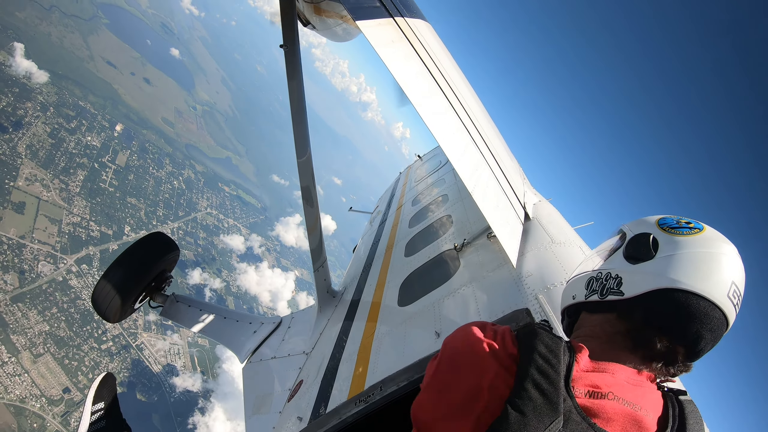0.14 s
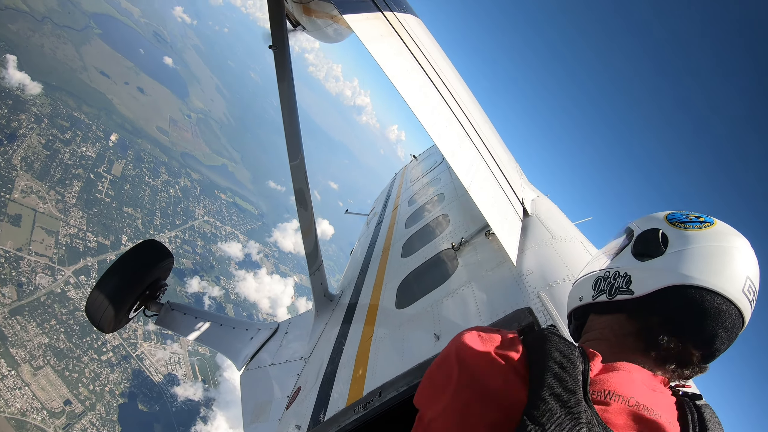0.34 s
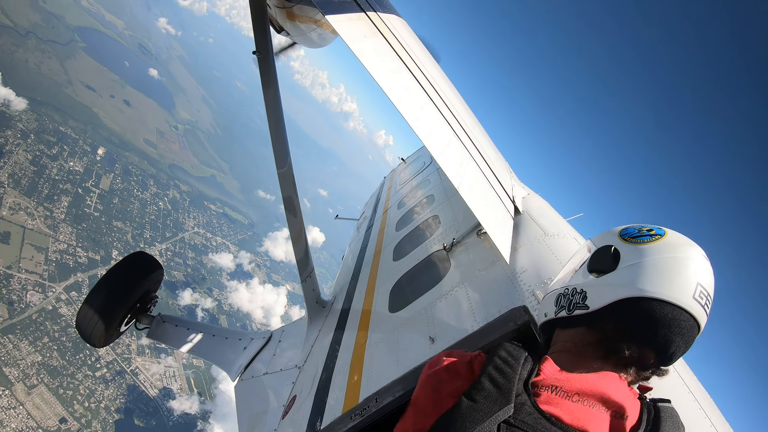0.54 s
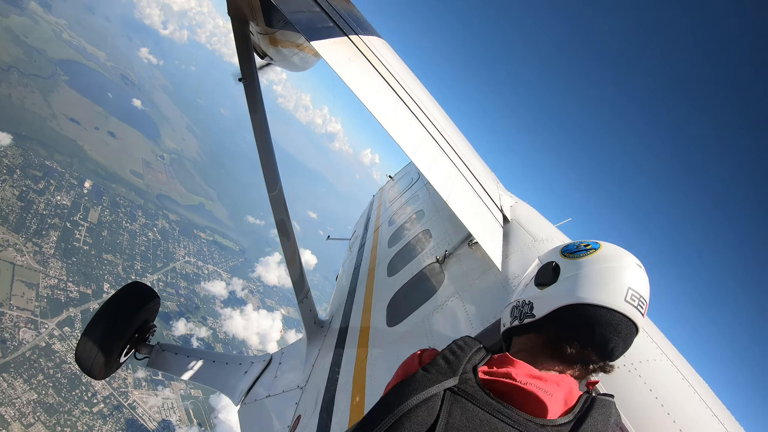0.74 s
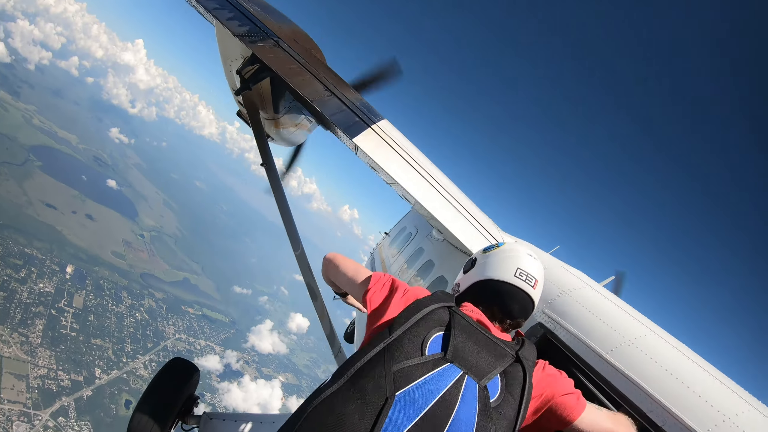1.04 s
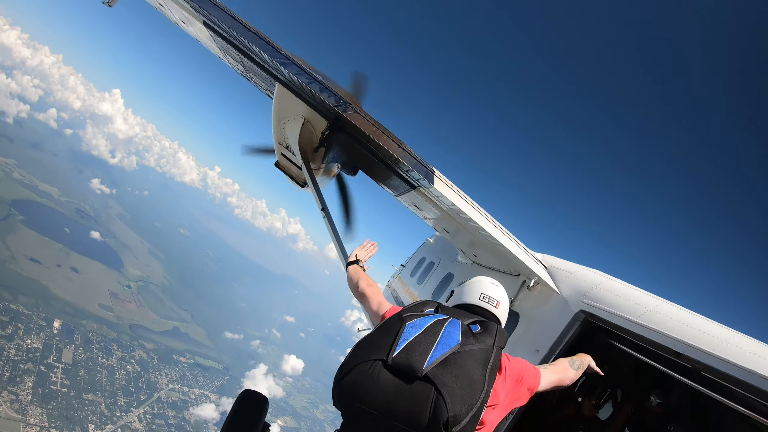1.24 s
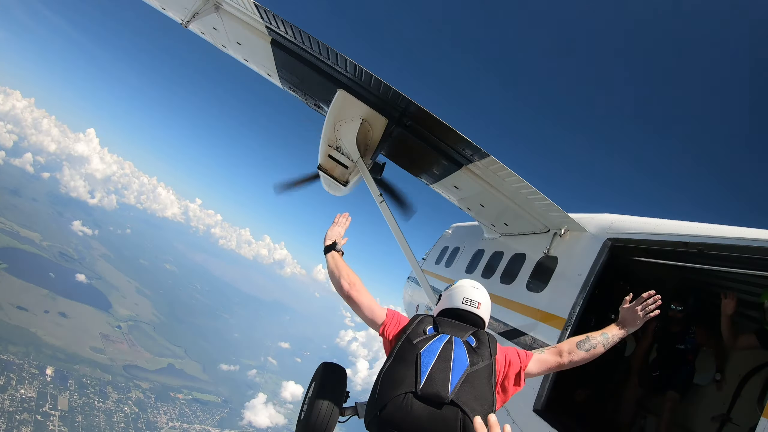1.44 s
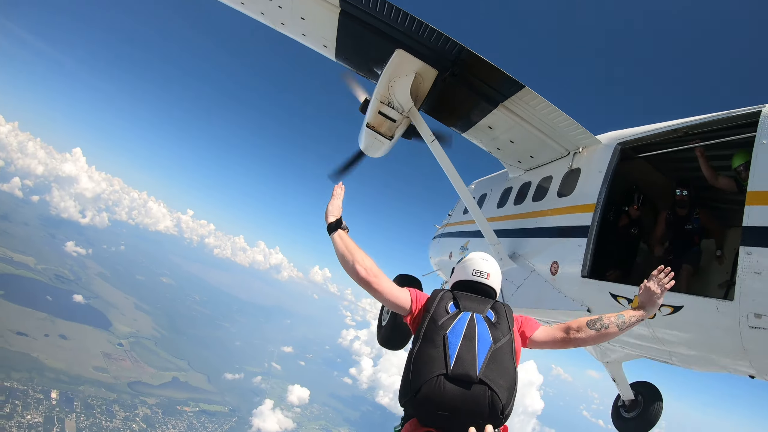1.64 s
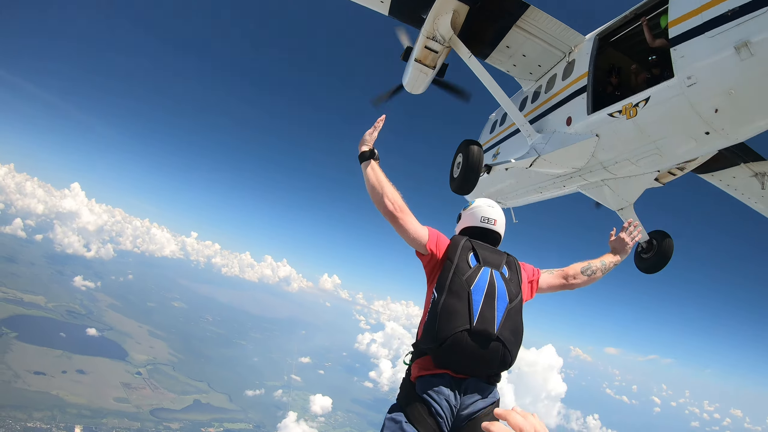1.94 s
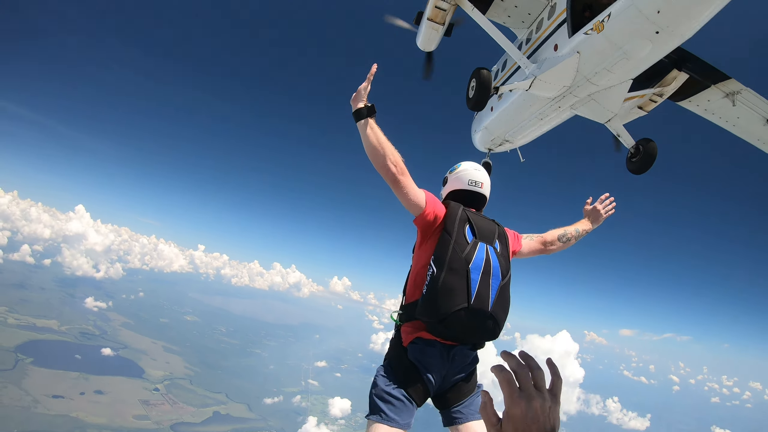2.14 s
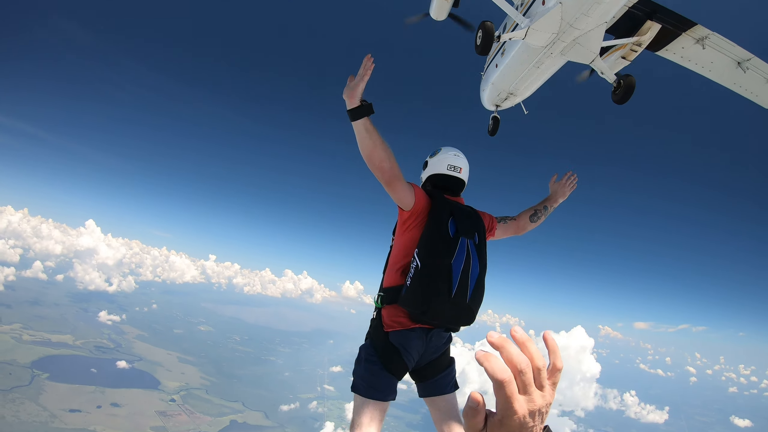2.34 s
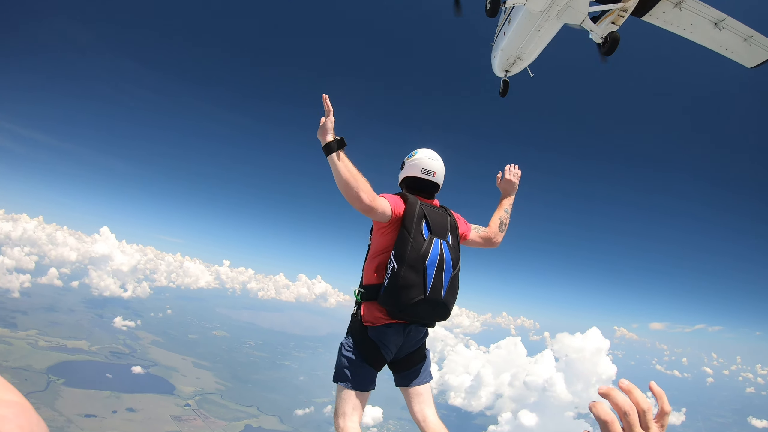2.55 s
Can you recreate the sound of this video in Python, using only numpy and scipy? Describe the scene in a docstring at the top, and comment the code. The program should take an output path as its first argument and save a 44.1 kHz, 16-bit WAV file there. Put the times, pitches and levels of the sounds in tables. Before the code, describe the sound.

Turbulent wind roar throughout, with hard thumps, fluttering gusts and small cloth crackles; a wavering aircraft propeller drone lies behind the first half, then freefall wind alone grows fuller, the microphone overloading slightly.

```python
"""Wind tears over a helmet camera's microphone as a jumper drops away from a propeller aircraft.
Turbulence is built as filtered noise: large eddies rumble, small ones rush past at an unsteady speed,
gusts burst as brief envelopes, and single eddies slap as dips in pressure. Cloth and straps crackle,
air whistles and spits at edges. Behind them the propeller's wavering drone sinks and dies away, and
the slipstream's noise bands thin out. The loudest swings are rounded off."""
import sys
import numpy as np
from scipy import signal
from scipy.fft import rfft, irfft
from scipy.io import wavfile
from scipy.ndimage import uniform_filter1d

SR = 44100
rng = np.random.default_rng(int(sys.argv[2]) if len(sys.argv) > 2 else 0)


def transcribe(signal):
    """Save signal, clipped to [-1, 1], as a 16-bit WAV file at the path in sys.argv[1]."""
    frames = np.atleast_2d(signal).T
    limited = np.clip(frames, -1, 1)
    pcm = np.round(limited * 32767).astype(np.int16)
    wavfile.write(sys.argv[1], SR, pcm)


def invert_db(level):
    """Linear amplitude ratio for a level in decibels (20 dB per decade), elementwise."""
    return 10 ** (np.asarray(level, dtype=float) / 20)


N = 118629
T = np.arange(N) / SR  # s

# large eddies: t/s, level of deep thuds/dB, level of boom/dB, level of body of the rumble/dB
EDDY_LEVELS = [(0.0, -25, -28, -13), (0.4, -21.5, -17, -15), (1.18, -20, -22, -16),
               (1.225, -19.5, -18.5, -23), (1.44, -23, -14, -15), (1.62, -15.5, -20.5, -25),
               (1.88, -17.5, -26.5, -21), (2.01, -20.5, -16.5, -23), (2.1, -13.5, -22, -20.5),
               (2.24, -22, -19.5, -16.5), (2.32, -23.5, -28.5, -17), (2.4, -24, -23, -16),
               (2.61, -17, -16, -19), (2.66, -29, -9.5, -22.5)]
# gusts: t/s at the end of the rise, envelope level before its fall/dB, fall time/s
GUST_TIMES = [(0.125, -23, 0.0084), (0.26, -18, 0.013), (0.299, -23, 0.009), (0.459, -22.5, 0.0066),
              (0.561, -7, 0.0026), (0.748, -15, 0.0052), (0.949, -22.5, 0.019), (1.084, -6, 0.0043),
              (1.109, -14.5, 0.0084), (1.123, -19, 0.021), (1.159, -6, 0.0042), (1.185, -13.5, 0.0039),
              (1.25, -15, 0.013), (1.312, -7.5, 0.0027), (1.393, -17, 0.0051), (1.415, -12, 0.007),
              (1.447, -11.5, 0.0062), (1.471, -10, 0.0044), (1.511, -10, 0.0045), (1.539, -21.5, 0.0034),
              (1.553, -15.5, 0.013), (1.638, -16, 0.0039), (2.081, -22, 0.0069), (2.147, -17.5, 0.012),
              (2.275, -10, 0.0062), (2.308, -14.5, 0.007), (2.34, -12, 0.0078), (2.367, -15.5, 0.027),
              (2.416, -10.5, 0.0073), (2.448, -22.5, 0.02), (2.491, -12, 0.012), (2.57, -16, 0.016),
              (2.627, -15, 0.015)]
FLUTTER_HZ, FLUTTER_DB = 147, 1  # upper corner of the flutter; its rms depth in the rush and the gusts


def evened(x):
    """Normalisation of power: scales to rms 1."""
    return x / np.sqrt(np.mean(x ** 2) + 1e-20)


def read(points, hz):
    """Spectral density in dB, interpolated over log frequency; -120 dB outside the table."""
    f, value = np.transpose(points)
    return np.interp(np.log(hz + 1), np.log(f + 1), value, left=-120, right=-120)


def curve(rows, t, axis):
    """Slow variation in time: linear interpolation of one column of a time table."""
    rows = np.array(rows)
    return np.interp(t, rows[:, 0], rows[:, axis])


def wobble(size, rate, top_hz):
    """Band-limited random modulation of rms 1, weakened below a low corner and above top_hz."""
    low_hz = min(4, top_hz / 4)
    hz = np.fft.rfftfreq(size, 1 / rate)
    shape = hz / np.sqrt((hz ** 2 + low_hz ** 2) * (1 + (hz / top_hz) ** 4))
    return evened(irfft(rfft(rng.standard_normal(size)) * shape, size))


def noise(field_db, size):
    """Time-varying filtering: random Fourier bins weighted by field_db(hz, t), then overlap-added."""
    frames = 4 * N // size + 6
    hz = np.fft.rfftfreq(size, 1 / SR)[:, None]
    t = np.arange(frames) * size / 4 / SR
    real, imaginary = rng.standard_normal((frames, size // 2 + 1, 2)).T
    bins = (real + 1j * imaginary) * invert_db(field_db(hz, t))
    return signal.istft(bins, nperseg=size, noverlap=3 * size // 4)[1][:N]


def steady(tone, size):
    """Stationary coloured noise: one spectral density throughout, rms 1."""
    return evened(noise(lambda hz, t: read(tone, hz) + 0 * t, size))


def narrow_noise(hz, width_hz):
    """Amplitude modulation by a complex random signal: a noise band about hz, rms near 1."""
    shake = wobble(N, SR, width_hz) + 1j * wobble(N, SR, width_hz)
    return (shake * np.exp(2j * np.pi * hz * T)).real


def burst(s, db, rise, fall):
    """Transient envelope: a linear rise ending at s, times a Gaussian fall that begins with the rise."""
    u = np.maximum(T - s + rise, 0)
    return invert_db(db) * np.minimum(u / rise, 1) * np.exp(-(u / fall) ** 2)


def hum(hz, db, end):
    """Spectral line broadening: a tone partly clean and partly shaken by the air, gone by end."""
    width_hz, fuzz = 12, 0.33  # fuzz: weight of the shaken part
    turn = np.exp(2j * np.pi * np.cumsum(hz) / SR)
    shake = wobble(N, SR, width_hz) + 1j * wobble(N, SR, width_hz)
    tone = evened((turn * (1 - fuzz + fuzz * shake)).real)
    fade = np.clip((end - T) / 0.26, 0, 1)
    return fade * invert_db(db) * tone


def propeller():
    """Periodic blade tone, wavering and sinking as the aircraft recedes, and a hum above it."""
    # blade tone: t/s, f/Hz, level before the final fade/dB
    blade_rows = [(0, 137.7, -15), (.37, 125.7, -15), (.58, 154.5, -18), (.82, 116.6, -16.5),
                  (.95, 99.1, -20), (1.35, 102, -21.5), (1.5, 98, -12.5)]
    # second hum near the door: f/Hz, level before the final fade/dB, end t/s
    door_hum = (205, -21, 0.91)
    hz, db, end = door_hum
    blades = hum(curve(blade_rows, T, axis=1), curve(blade_rows, T, axis=2), blade_rows[-1][0])
    return blades + hum(hz + 0 * T, db, end)


def hiss(flutter):
    """Broadband slipstream noise in two bands; the airy top has a flutter partly its own."""
    # slipstream: t/s, level of lower hiss before flutter/dB, level of airy top before flutter/dB
    hiss_levels = [(0, -33.5, -42.5), (.42, -33.5, -43.5), (.77, -39.5, -44.5), (.82, -34, -51.5),
                   (1.17, -43, -52.5), (1.36, -45.5, -56), (1.55, -38.5, -64), (1.75, -39.5, -58),
                   (2.0, -42, -62), (2.3, -41.5, -61), (2.66, -49, -61)]
    # spectral density of the lower hiss: f/Hz, relative level per Hz/dB
    lower_tone = [(900, 3.5), (2000, -1), (3000, -0.5), (3800, -9), (5000, -26), (7000, -39)]
    # spectral density of the airy top: f/Hz, relative level per Hz/dB
    top_tone = [(2500, -5.5), (4500, 0.5), (6500, -11.5), (9000, -24.5), (10200, -28), (12000, -54),
                (15500, -57)]
    lower_flutter_db, top_flutter_db = 3.5, 3
    own = (flutter + wobble(N, SR, FLUTTER_HZ)) / np.sqrt(2)
    lower_db = curve(hiss_levels, T, axis=1) + lower_flutter_db * flutter
    top_db = curve(hiss_levels, T, axis=2) + top_flutter_db * own
    return invert_db(lower_db) * steady(lower_tone, size=512) + invert_db(top_db) * steady(top_tone, size=512)


def whistles():
    """Edge tones: faint narrow bands of noise, from air over an edge, that swell and fade."""
    # whistles: start t/s, length/s, f/Hz, level at the height of the swell/dB
    whistle_rows = [(0.795, 0.11, 5600, -57.5), (1.202, 0.14, 3220, -45), (1.483, 0.11, 2190, -41),
                    (1.6, 0.13, 3620, -56)]
    out = np.zeros(N)
    for s, length, hz, db in whistle_rows:
        swell = np.sin(np.pi * np.clip((T - s) / length, 0, 1)) ** .5
        out += invert_db(db) * swell * narrow_noise(hz, width_hz=130)
    return out


def spits():
    """Edge turbulence: thin Gaussian puffs of noise, each gathered round its own pitch."""
    # spits of air past an edge: t/s, level at the envelope's peak/dB, f/Hz
    spit_rows = [(1.258, -18.5, 622), (1.881, -36.5, 2330), (1.912, -33, 2285), (1.93, -36, 2690),
                 (1.95, -34.5, 2280), (1.967, -34, 2210), (1.984, -25, 1480), (2.015, -30.5, 2250),
                 (2.045, -24, 1435), (2.058, -27, 1900), (2.092, -26, 1494), (2.126, -28, 1746),
                 (2.172, -24, 1283), (2.196, -26.5, 2138), (2.213, -18.5, 1413), (2.23, -26, 1048),
                 (2.243, -22.5, 1003), (2.387, -29, 1090), (2.51, -23.5, 1202), (2.526, -33.5, 2200)]
    spit_s, width_share = .0035, .28  # Gaussian time; width as a share of the pitch
    out = np.zeros(N)
    for s, db, hz in spit_rows:
        envelope = np.exp(-((T - s) / spit_s) ** 2)
        out += invert_db(db) * envelope * narrow_noise(hz, width_share * hz)
    return out


def crackles():
    """Impulsive friction of cloth and straps: very short envelopes on bright noise."""
    # crackles: t/s at the end of the rise, envelope level before its fall/dB
    crackle_rows = [(0.1248, -26), (0.3412, -29.5), (0.455, -29), (0.5916, -31), (0.6599, -30.5),
                    (0.7025, -29.5), (0.7332, -25.5), (0.771, -30), (0.9386, -27.5), (1.073, -33.5),
                    (1.107, -30.5), (1.1954, -31.5), (1.151, -36), (1.383, -38.5), (1.435, -49),
                    (1.5235, -36), (1.6411, -30.5), (1.704, -37.5), (2.2867, -32.5), (2.3452, -41),
                    (2.366, -32), (2.414, -44), (2.458, -44.5), (2.575, -35), (2.602, -49), (2.6293, -32.5),
                    (2.675, -36.5)]
    # spectral density: f/Hz, relative level per Hz/dB
    crackle_tone = [(1200, -9.5), (2500, 9), (4000, 7), (6000, -14), (9000, -24), (10500, -45.5),
                    (12500, -69)]
    envelope = sum(burst(s, db, rise=0.0015, fall=0.0062) for s, db in crackle_rows)
    return envelope * steady(crackle_tone, size=512)


def gusts(flutter):
    """Intermittency of turbulence: short fluttering puffs of coloured noise."""
    # spectral density: f/Hz, relative level per Hz/dB
    puff_tone = [(250, 1), (600, -0.5), (1200, -7), (2400, -16.5), (4000, -39), (6000, -65.5)]
    envelope = sum(burst(s, db, 0.0047, fall) for s, db, fall in GUST_TIMES)
    return envelope * invert_db(FLUTTER_DB * flutter) * steady(puff_tone, size=512)


def slaps():
    """Impulse response to single eddies at the port: brief dips, random ones and a hard one per gust."""
    kinds, low_hz, high_hz = 7, 137, 480  # dip widths, named by the frequency where each is strongest
    per_s, spread_db, below_body_db = 60, 3.5, -8.5
    gust_db, gust_lag_s = 4.5, 0.002  # hard dip relative to its gust
    soft, hard = np.zeros(N), np.zeros(N)
    t = np.arange(-400, 401) / SR
    gust_kind = rng.integers(0, kinds, len(GUST_TIMES))
    for k, hz in enumerate(np.geomspace(low_hz, high_hz, num=kinds)):
        u = np.pi * hz * t
        dip = (2 * u ** 2 - 1) * np.exp(-u ** 2)
        strength_db = spread_db * np.minimum(rng.exponential(1, N), 3)
        hits = (rng.random(N) < per_s / kinds / SR) * invert_db(strength_db)
        soft += signal.oaconvolve(hits, dip, "same")
        blows = np.zeros(N)
        for (s, db, _), chosen in zip(GUST_TIMES, gust_kind == k):
            blows[round((s + gust_lag_s) * SR)] += chosen * invert_db(db + gust_db)
        hard += signal.oaconvolve(blows, dip, "same")
    return invert_db(curve(EDDY_LEVELS, T, axis=3) + below_body_db) * evened(soft) + hard


def rush(flutter):
    """Velocity scaling of small eddies: faster air slides their spectrum up and makes it louder."""
    # small eddies: t/s, level/dB
    rush_levels = [(0.0, -19.5), (0.3, -21), (0.76, -20.5), (0.92, -28), (1.17, -19.5), (1.225, -26),
                   (1.26, -20.5), (1.6, -23.5), (1.8, -24), (1.98, -23), (2.35, -16.5), (2.69, -16.5)]
    # spectral density: f/Hz, relative level per Hz/dB
    small_tone = [(120, -9.5), (250, 5), (400, -6.5), (700, -9), (1200, -17.5), (2200, -26.5), (3400, -53),
                  (5000, -72), (8000, -68), (12000, -102)]
    speed_oct, speed_hz, flicker_db, patch_db = 0.23, 90, 1, 2  # rms depths; upper corner of speed

    def field(hz, t):
        """Spectrum shifted by the jolts of speed, with random patches over frequency and time."""
        jolt = wobble(len(t), 1 / t[1], speed_hz)
        patches = rng.standard_normal((len(t), len(hz))).T
        patches = uniform_filter1d(patches, size=6, axis=0)
        patches = evened(uniform_filter1d(patches, size=5, axis=1))
        shifted = read(small_tone, hz / 2 ** (speed_oct * jolt))
        return shifted + flicker_db * jolt + patch_db * patches

    fluttering = evened(invert_db(FLUTTER_DB * flutter) * noise(field, size=256))
    return invert_db(curve(rush_levels, T, axis=1)) * fluttering


def rumble(flutter):
    """Low-frequency pressure of large eddies: thuds, boom and body, each noise with its own level."""
    # spectral density of the deep thuds: f/Hz, relative level per Hz/dB
    deep_tone = [(15, -13.5), (30, -5), (55, 9.5), (90, 0), (140, -15.5), (250, -34.5)]
    # spectral density of the boom: f/Hz, relative level per Hz/dB
    boom_tone = [(60, -23.5), (85, -3), (115, -5), (145, -6), (200, -24)]
    # spectral density of the fuller body: f/Hz, relative level per Hz/dB
    body_tone = [(40, -27.5), (90, -11.5), (140, -3.5), (210, -2), (300, -8.5), (420, -18), (700, -56)]
    body_flutter_db = 2
    thuds = invert_db(curve(EDDY_LEVELS, T, axis=1)) * steady(deep_tone, size=4096)
    boom = invert_db(curve(EDDY_LEVELS, T, axis=2)) * steady(boom_tone, size=4096)
    body_db = curve(EDDY_LEVELS, T, axis=3) + body_flutter_db * flutter
    return thuds + boom + invert_db(body_db) * steady(body_tone, size=2048)


def scene():
    """Superposition of pressures at one microphone; one fast flutter shakes several layers."""
    flutter = wobble(N, SR, FLUTTER_HZ)
    aircraft = propeller() + hiss(flutter)
    edges = whistles() + spits() + crackles()
    wind = gusts(flutter) + slaps() + rush(flutter) + rumble(flutter)
    return (aircraft + edges + wind)[None]


def top_cut(x):
    """Nothing passes above the cut-off."""
    return signal.sosfilt(signal.butter(12, 10850, fs=SR, output="sos"), x)


def record(dry):
    """Saturation: the capsule rounds off the biggest swings."""
    knee = 1.15  # greatest amplitude the curve approaches
    mix = knee * np.tanh(dry / knee)
    return top_cut(mix)


dry = scene()
out = record(dry)
transcribe(out)
```